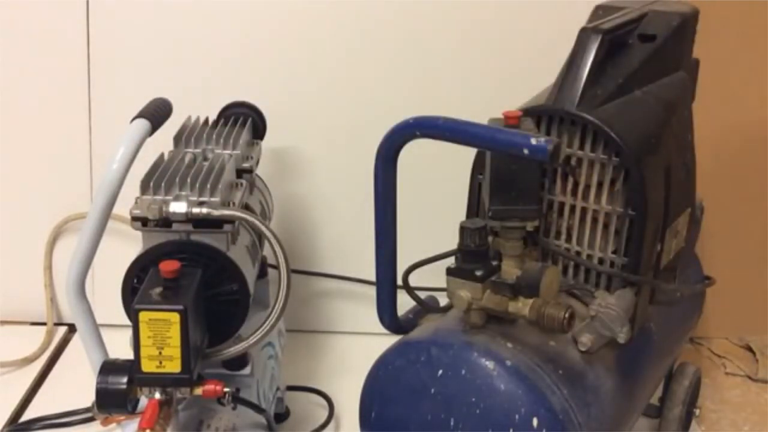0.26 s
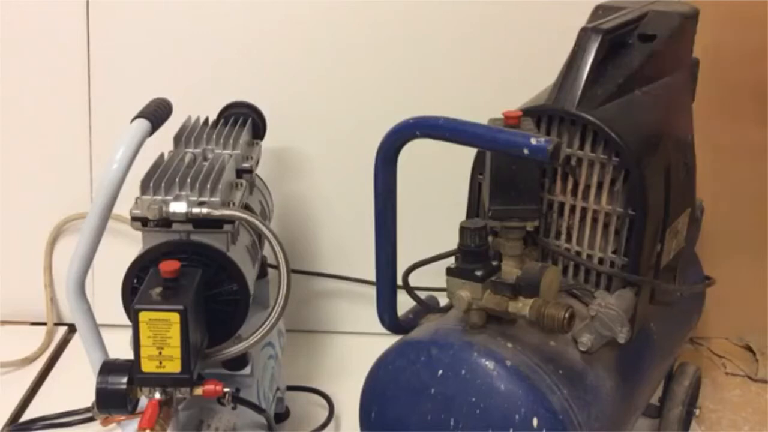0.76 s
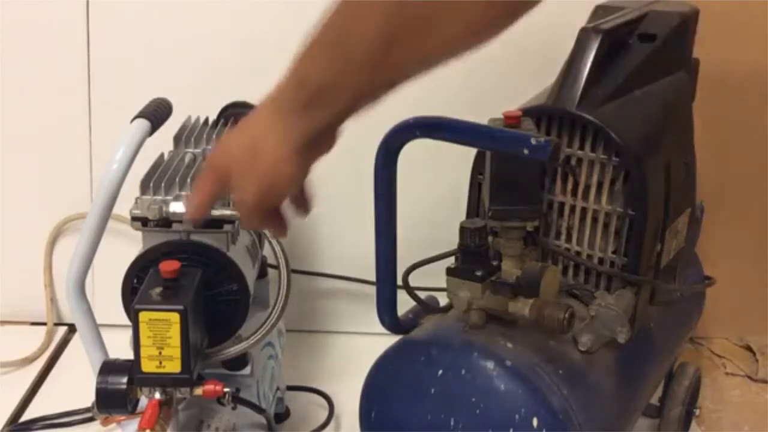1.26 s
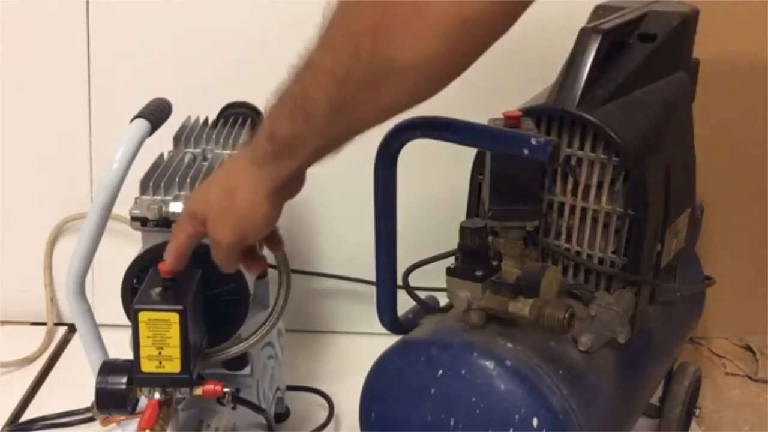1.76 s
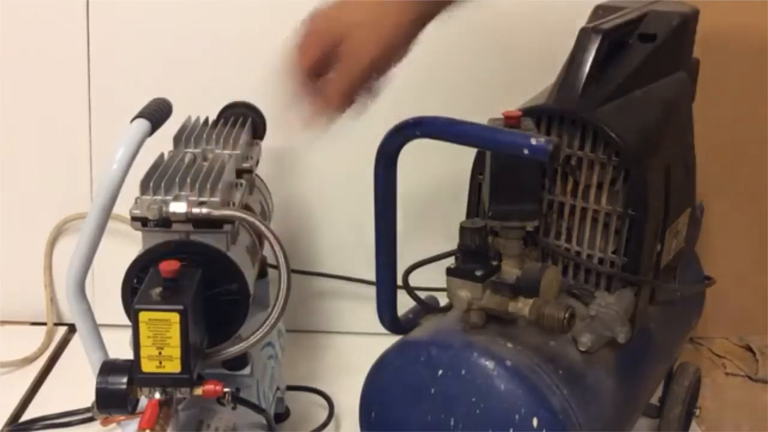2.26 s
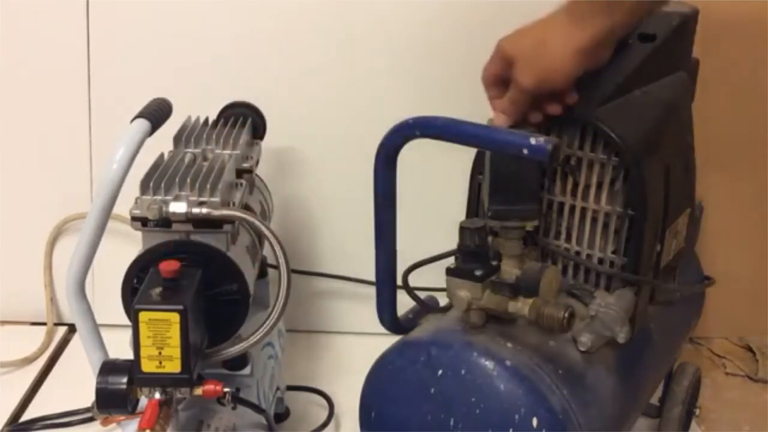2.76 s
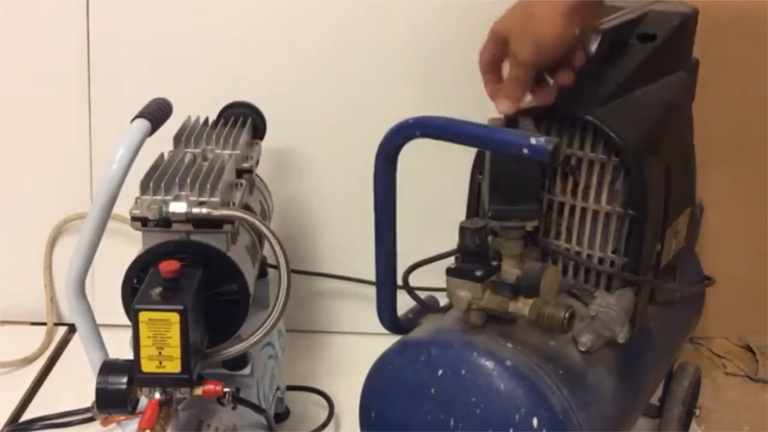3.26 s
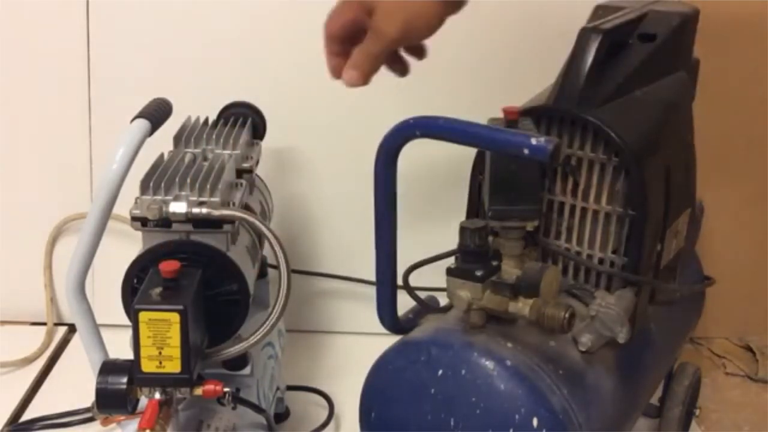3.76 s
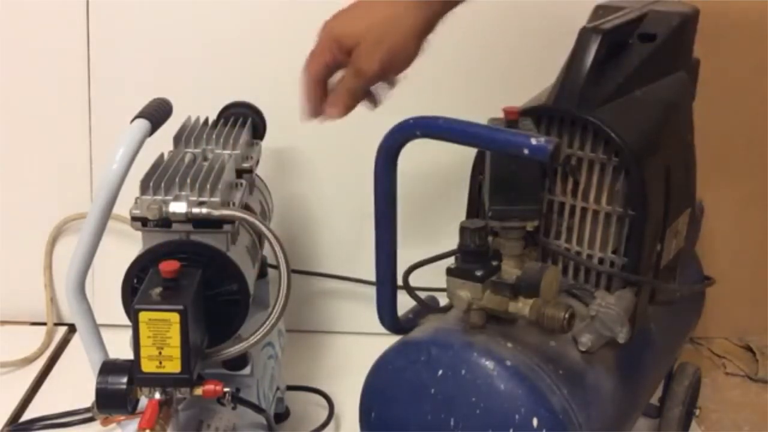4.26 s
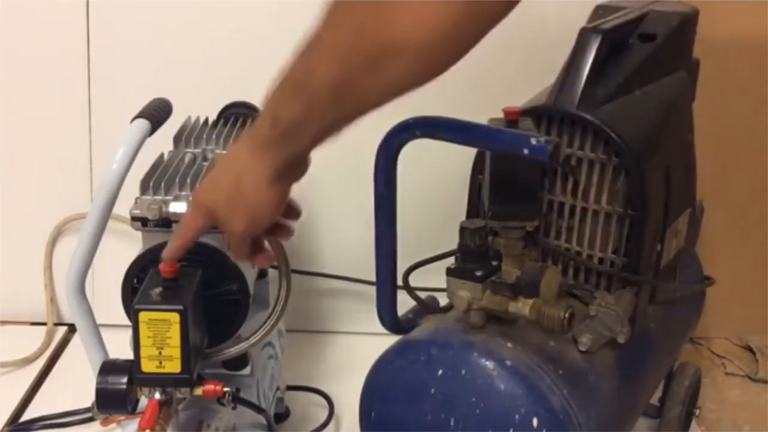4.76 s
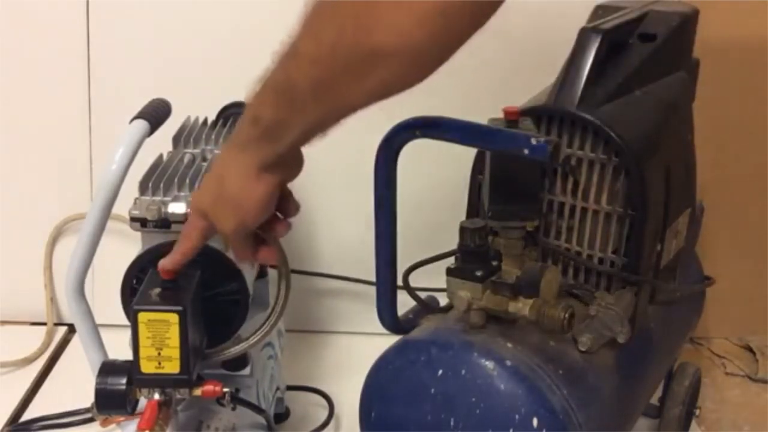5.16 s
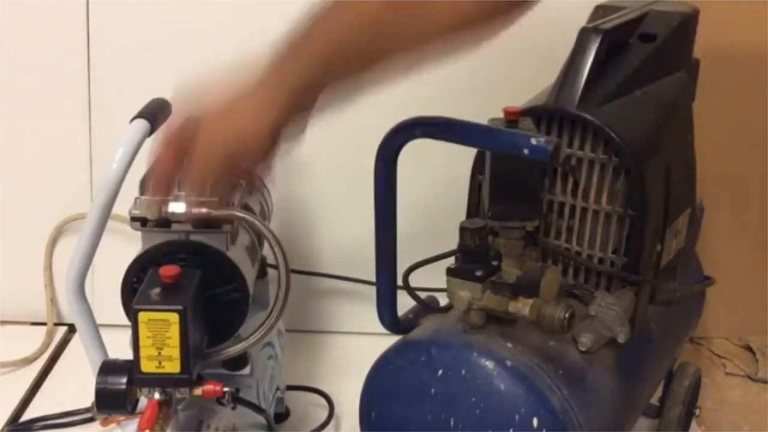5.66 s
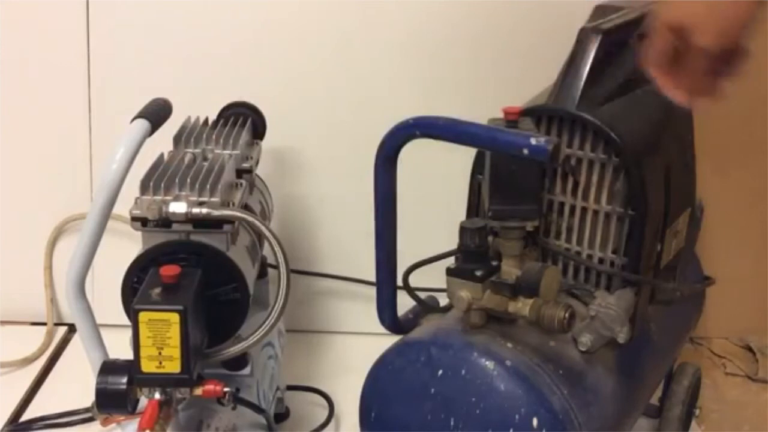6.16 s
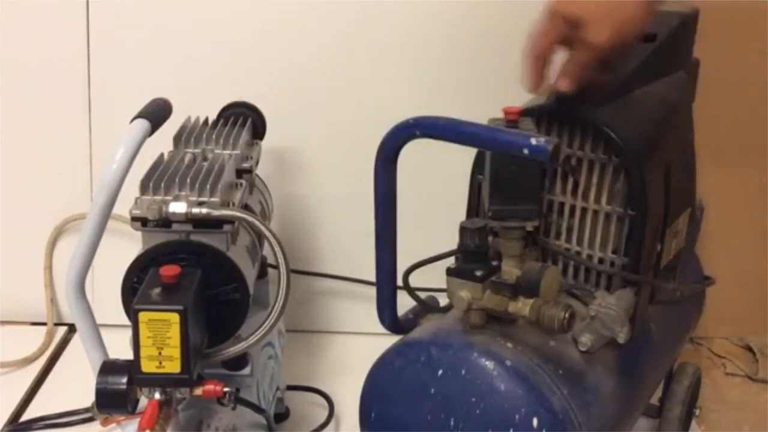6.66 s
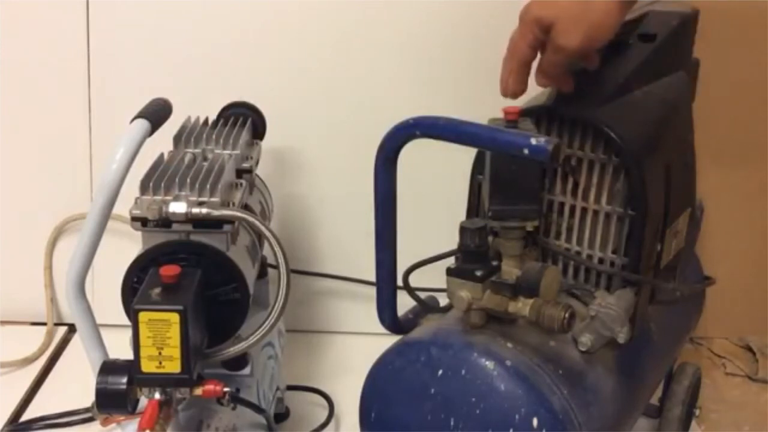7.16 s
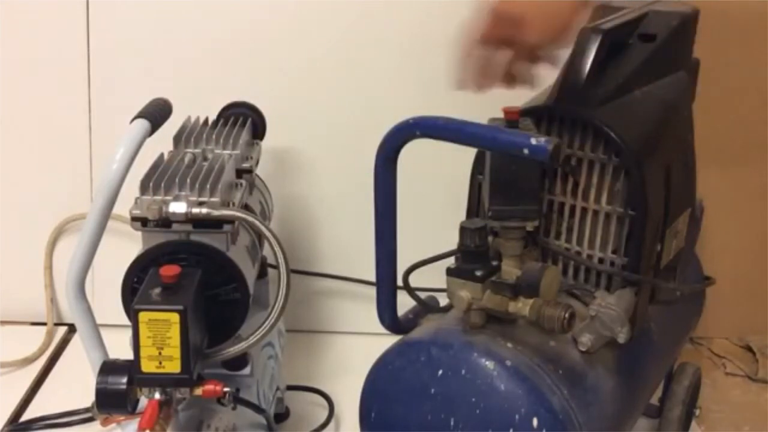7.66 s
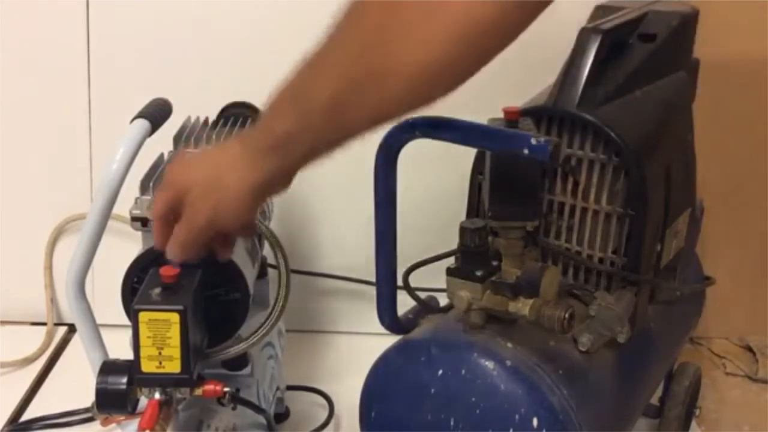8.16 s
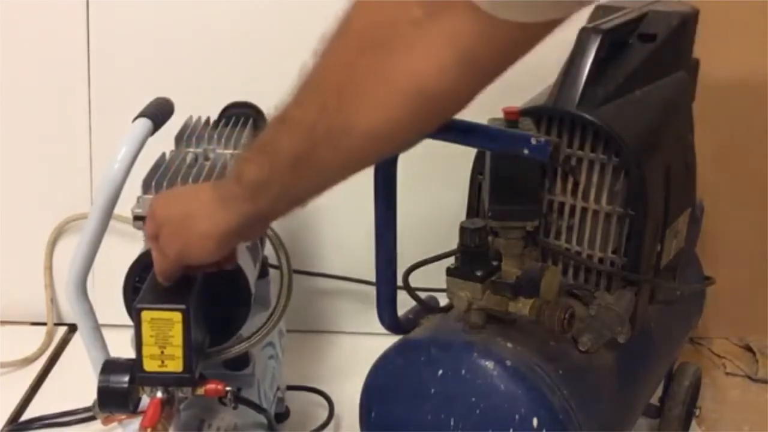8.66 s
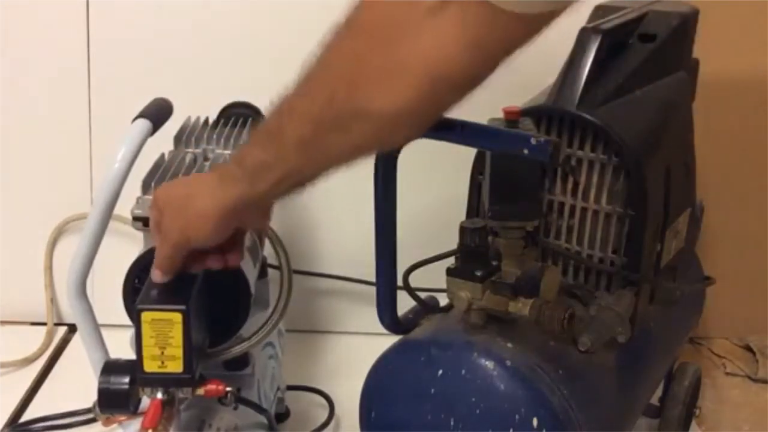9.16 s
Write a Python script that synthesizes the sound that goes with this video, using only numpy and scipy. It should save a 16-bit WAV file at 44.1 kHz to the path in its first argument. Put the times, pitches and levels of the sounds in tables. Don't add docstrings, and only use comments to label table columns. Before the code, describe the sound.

Soft, quick motor chugging is overtaken by a rattling start and a harsh compressor roar; a short pressure hiss, then a sharp final click.

```python
import sys
import numpy as np
from scipy import signal
from scipy.fft import irfft
from scipy.io import wavfile
from scipy.ndimage import uniform_filter1d

SR = 44100
rng = np.random.default_rng(int(sys.argv[2]) if len(sys.argv) > 2 else 0)


def magnitude_from_level(level_db):
    exponent = np.asarray(level_db, float) / 20
    return 10 ** exponent


def digitize_waveform(pressure):
    field = np.atleast_2d(pressure).T
    bounded = np.clip(field, -1, 1)
    quanta = np.round(bounded * 32767).astype(np.int16)
    wavfile.write(sys.argv[1], SR, quanta)


N = 415422

# (time [s], speed [turns/s])
QUIET_SPEED = [(0.0, 24.017), (1.4, 24.023), (2.8, 23.875), (4.0, 23.881), (5.35, 23.832)]
LOUD_SPEED = [(3.35, 48.478), (4.5, 48.419), (6.0, 48.38), (7.5, 48.375), (9.42, 48.355)]
LOUD_SPIN_UP = [(3.0, 18), (3.088, 19), (3.122, 36), (3.147, 45.5), (3.18, 49), (3.26, 48.5)]
# (frequency [Hz], level [dB per Hz])
QUIET_AIR = [(24, -51), (40, -20), (120, -4.5), (227, 2.5), (330, -12.5), (422, -6.5), (600, -14),
             (730, -9), (1320, -11), (1540, -7), (1700, -14.5), (2300, -14.5), (9360, -20.5), (15000, -28)]
LOUD_AIR = [(18, -66), (30, -30), (147, -15.5), (211, -12), (240, -24.5), (346, -8), (581, -15),
            (900, -14.5), (1520, -14), (1650, -18.5), (1920, -15.5), (7060, -15.5), (15000, -32)]
# (crank angle [turns], level over the steady rush [dB], rise [turns], fall [turns])
QUIET_VALVES = [(0, 5.5, .004, 0.033), (.05, -1, .05, 0.23), (.48, -1, .006, .03), (.58, 2, .03, .07)]
LOUD_VALVES = [(.08, 3.5, 0.18, 0.16), (.2, 4.5, 0.008, 0.014), (.52, -10, .02, 0.024),
               (.8, -4.5, 0.022, 0.028)]
# (frequency [Hz], width [Hz], level [dB])
COWL_PEAKS = [(4100, 300, 1.5), (5730, 300, 2.5), (6470, 490, -2), (7200, 260, -1), (9230, 820, 3.5),
              (13200, 600, 2), (14600, 900, 3)]
# (time [s], peak level [dB])
FIRST_BLOWS = [
    (3.0682, -6.5),
    (3.108, -3),
    (3.136, -11.5),
    (3.157, -15),
    (3.18, -10),
    (3.205, -13.5),
    (3.236, -14),
]
# (frequency [Hz], level [dB], time to die by 60 dB [s])
FRAME_MODES = [(265, 1.5, 0.13), (313, 4, 0.56), (476, -10, 0.11), (695, -15, 0.24), (805, 0.5, 0.031),
               (1038, -3.5, 0.16), (2045, -6.5, 0.18)]
# (frequency [Hz], level [dB per Hz])
COWL_RATTLE = [(300, -42), (700, 2), (1000, 9.5), (1400, -24), (2050, 1), (2600, -21), (3500, -1),
               (6000, -13), (12000, -41)]
# (frequency [Hz], level [dB per Hz])
VENT_AIR = [(1000, -30), (2500, -9), (4000, 1), (8000, 0), (12000, -7), (15000, -10)]
# (time [s], peak level [dB], frequency [Hz])
TOUCH_AND_CLICKS = [
    (2.648, -25, 620),
    (3.051, -20, 1900),
    (3.058, -30, 2900),
    (5.337, -16, 2490),
    (9.073, -4, 5400),
]
# (crank angle [turns], level [dB])
REED_SLAPS = [
    (.04, 4),
    (0.513, -1.5),
]
# (frequency [Hz], level [dB], time to die by 60 dB [s])
HEAD_MODES = [(1050, -4, 0.015), (1460, -9, 0.05), (1476, 2, 0.081), (1510, -4, 0.06), (1562, 0, 0.11),
              (1608, -21, 0.073), (1920, 2.5, .02), (2400, -3, 0.026), (4200, -19, 0.0054)]
# (multiple [of crank speed], level [dB], moment of swing [s], swing [dB])
QUIET_ORDERS = [(1, -43, 1, -2), (2, -26, 1, 0), (3, -24, .3, -3), (4, -1, 1, 0), (5, -1, .3, -2),
                (6, -7.5, .3, 2), (7, -11.5, 1, 3.5), (8, -14, 2.5, 0), (9, 2.5, 0.12, -6),
                (10, -4.5, .3, 1.5), (11, -24, 2.5, -6), (12, -5.5, .3, -19)]
LOUD_ORDERS = [(1, -30, 6, 0), (2, -55, 6, -10), (3, 4, 8.7, 2), (4, -1, 8.7, -2), (5, -20, 2.1, 5),
               (6, -10, 8.85, 6), (7, -0.5, 5.4, 2), (8, -1.5, 5.1, -1), (9, 0, 6.56, -6.5),
               (10, -13, 9, -13), (11, -9.5, 9.6, -25), (12, -18, 6.4, -27), (13, -13.5, 9.5, -9),
               (14, -18, 7.3, -2.5), (15, -8, 9.1, 7), (16, -8, 8.6, 5.5), (17, -9, 9.1, -35),
               (18, -15, 5, -31), (19, -9.5, 5.9, 3), (20, -19, 6.4, 11), (21, -13, 7.05, 9.5),
               (22, -7, 8.6, -17), (23, -18, 8, 5), (24, -18.5, 4.2, -10)]
# (frequency [Hz], width [Hz], level [dB], moment of swing [s], swing [dB])
QUIET_CASING = [(384, 17, -15.5, 1, -2), (408, 20, -15, 1, -11), (432, 8.9, -9.5, 1, 1),
                (480, 19, -22, .3, -17), (528, 7.8, -8.5, 2.9, -3.5), (576, 28, -28, .8, 8),
                (696, 18, -12, .3, -12), (744, 14, -13.5, 1, 1), (854, 140, -17.5, 1, -4),
                (990, 80, -17.5, 1, 0), (1056, 20, -19, 1, 6), (1152, 17, -13.5, 1, 3),
                (1253, 41, -12.5, .3, -12)]
LOUD_CASING = [(1222, 125, -11, 7, 2), (1355, 37, -10.5, 3.9, -12), (1452, 33, -21.5, 8, 8.5),
               (1500, 57, -10.5, 1.46, -17.5), (1549, 17, -7, 7, -7), (1645, 36, -20, 4, -6),
               (1742, 36, -15, 3.7, 2), (1890, 73, -11.5, 3.7, -9), (1984, 62, -12.5, 7, -1),
               (2081, 29, -15, 7, -7), (2140, 180, -15, 1.8, 21), (2390, 110, -15.5, 7, -11),
               (2900, 50, -13, 6.9, 2.5), (3310, 200, -17, 7, -3)]
# (frequency [Hz], crank angle [turns])
ANSWER_ANGLES = [(270, .3), (310, 1.07), (415, .62), (455, .18), (1100, .28), (2000, .4)]


def loud_pump():
    t = np.arange(N) / SR
    turns = crank(LOUD_SPIN_UP + LOUD_SPEED, stroke_s=6.513)
    first_s, second_s = FIRST_BLOWS[0][0], FIRST_BLOWS[1][0]

    pressure = np.clip((t - 3.1) / 0.051, 0, 1)
    surge_db = -1 * np.exp(-np.maximum(t - second_s, 0) / 0.053)
    strokes = pulse_train(turns, 0, pressure * magnitude_from_level(-15.5 + surge_db), uneven_db=0.5, jitter_s=.00003)
    bodies = stances(LOUD_ORDERS, LOUD_CASING, between_db=-32, turn_hz=48.39, count=90,
                     moments=np.linspace(3.4, 9.4, 11))
    knock = casing(strokes, *bodies, 48.39, spread=.65, walk=.1, rocking=2, arrival=ANSWER_ANGLES)

    hiss = valve_rush(turns, LOUD_VALVES, LOUD_AIR, patchy_db=.9, uneven_db=2.0, gated_hz=1200, peaks=COWL_PEAKS)
    running = np.clip((t - first_s) / 0.0044 + 1, 0, 1)
    since = np.maximum(t - first_s, 0)
    air_db = -18.5 - 12.5 * np.exp(-(since / 0.068) ** 2) + 0.28 * slow_drift(15)

    throb = motor(turns - .3, order=2, throb_s=6.36, rock_db=-26.5, hum_db=-28)
    throb = np.clip((t - 3.1) / 0.035, 0, 1) ** 2 * throb
    return knock + throb + running * magnitude_from_level(air_db) * hiss


def quiet_pump():
    t = np.arange(N) / SR
    turns = crank(QUIET_SPEED, stroke_s=1.385)
    off_s, run_down_db_per_s = 5.34, 250
    running = magnitude_from_level(-run_down_db_per_s * np.clip(t - off_s, 0, .5))
    level = running * magnitude_from_level(-35)

    strokes = pulse_train(turns, 0, level, uneven_db=.6, jitter_s=.00005)
    bodies = stances(QUIET_ORDERS, QUIET_CASING, between_db=-31.5, turn_hz=23.99, count=54,
                     moments=np.linspace(0, 3, 5))
    knock = casing(strokes, *bodies, 23.99, spread=.06, walk=.15, rocking=4)

    slaps = sum(pulse_train(turns, angle, level * magnitude_from_level(db), uneven_db=1.3, jitter_s=.00005)
                for angle, db in REED_SLAPS)
    head_ring = signal.oaconvolve(slaps, ringing(HEAD_MODES, size=4000))[:N]
    head = magnitude_from_level(6.5) * highpass(head_ring, 780)

    hiss = valve_rush(turns, QUIET_VALVES, QUIET_AIR, patchy_db=.9, uneven_db=1.1, gated_hz=700)
    throb = level * motor(turns, order=4, throb_s=1.495, rock_db=-0.5, hum_db=-7.0)
    return knock + head + throb + running * magnitude_from_level(-37) * hiss


def vent():
    start_s, rise_s, hold_s = 5.335, 0.016, 0.097
    t = np.arange(N) / SR - start_s
    blast = magnitude_from_level(-16.5 - 120 * np.maximum(t - hold_s, 0))
    leak = magnitude_from_level(-23 - 39 * np.maximum(t, 0))
    opening = np.clip(t / rise_s, 0, 1)
    return opening * np.hypot(blast, leak) * air(VENT_AIR, patchy_db=3.0)


def first_blows():
    size = 12000
    out, t = np.zeros(N + size), np.arange(size) / SR
    rattle = air(COWL_RATTLE, patchy_db=1.2)
    fading = magnitude_from_level(-10.5 - 60 * t / 0.17)
    frame = ringing(FRAME_MODES, size)
    for s, db in FIRST_BLOWS:
        at = round(s * SR)
        out[at:at + size] += magnitude_from_level(db) * (frame + fading * rattle[at:at + size])
    return highpass(out[:N], 157)


def touch_and_clicks():
    size = 2000
    out = np.zeros(N + size)
    for s, db, hz in TOUCH_AND_CLICKS:
        at = round(s * SR)
        snap = ringing([(hz, 0, .01), (hz * 2.1, -2, .008), (hz * .7, -3, .008)], size)
        out[at:at + size] += magnitude_from_level(db) * snap
    return highpass(out[:N], 157)


def crank(speed, stroke_s):
    turns = np.cumsum(curve(speed)) / SR
    return turns - turns[round(stroke_s * SR)]


def pulse_train(turns, angle, level, uneven_db, jitter_s):
    whole = np.arange(np.ceil(turns[0]), turns[-1] - angle) + angle
    chance = rng.standard_normal((len(whole), 2))
    at = np.interp(whole, turns, np.arange(N)) + jitter_s * SR * chance[:, 0]
    at = np.clip(at, 0, N - 2)
    first, pulses = at.astype(int), np.zeros(N)
    size = magnitude_from_level(uneven_db * chance[:, 1]) * level[first]
    pulses[first], pulses[first + 1] = size * (1 - at + first), size * (at - first)
    return pulses


def stances(orders, modes, between_db, turn_hz, count, moments):
    multiple, t, bodies = np.arange(1, count + 1), np.arange(N) / SR, []
    between_db = between_db + 4 * rng.standard_normal(count)
    for s in moments:
        def swung(db, at_s, swing_db):
            return db + swing_db * np.exp(-((s - at_s) / 0.97) ** 2)

        power = magnitude_from_level(between_db) ** 2
        for hz, width, *row in modes:
            off_centre = 2 * (multiple * turn_hz - hz) / width
            power = power + (magnitude_from_level(swung(*row)) / (1 + off_centre ** 2)) ** 2
        low_db = [swung(*row[1:]) for row in orders]
        bodies.append(np.c_[multiple, np.r_[low_db, 10 * np.log10(power[len(orders):])]])
    return bodies, [np.interp(t, moments, one) for one in np.eye(len(moments))]


def casing(pulses, bodies, shares, turn_hz, spread, walk, rocking, arrival=None):
    order = np.transpose(bodies[0])[0]
    hz = np.fft.rfftfreq(16384, 1 / SR)
    at = np.r_[0, order, order[-1] + 4] * turn_hz
    gains_db = []
    for body in bodies:
        level_db = np.transpose(body)[1] - 25 * (order == rocking)
        gains_db.append(np.interp(hz, at, np.r_[-60, level_db, -60]))
    mean_db = np.mean(gains_db, axis=0)
    mirrored = np.log(magnitude_from_level(np.r_[mean_db, mean_db[-2:0:-1]]))
    causal = -np.imag(signal.hilbert(mirrored))[:len(hz)]
    late = np.cumsum(rng.random(len(at))) * spread
    if arrival:
        steps = np.diff(late, prepend=0) - spread / 2
        answer = np.interp(at - turn_hz / 2, *np.transpose(arrival))
        late = np.cumsum(answer + steps * np.clip(at / 200 - 2.3, 0, 1))
        causal = 0
    turn = np.exp(1j * causal - 2j * np.pi * np.interp(hz, at, late))

    paths = [(share, magnitude_from_level(gain_db)) for share, gain_db in zip(shares, gains_db)]
    for _ in range(3):
        re, im = rng.standard_normal((len(at), 2)).T * np.minimum(at / 600, 1) ** 2
        wander = np.interp(hz, at, re) + 1j * np.interp(hz, at, im)
        paths.append((walk * slow_drift(1.614), magnitude_from_level(mean_db) * wander))
    out = 0
    for share, gain in paths:
        ring = np.roll(irfft(gain * turn), 2000)[:8000]
        out = out + signal.oaconvolve(pulses * share, ring)
    return out[2000:N + 2000] / np.sqrt(np.sum(irfft(magnitude_from_level(mean_db)) ** 2) * turn_hz / SR)


def valve_rush(turns, valves, colour, patchy_db, uneven_db, gated_hz, peaks=()):
    power = np.ones(N)
    index = (np.floor(turns) - np.floor(turns[0])).astype(int)
    for angle, puff_db, rise, fall in valves:
        past = (turns - angle + 0.324) % 1 - .3
        puff = np.exp(np.where(past < 0, past / rise, -past / fall))
        sizes = magnitude_from_level(puff_db + uneven_db * rng.standard_normal(index[-1] + 1))
        power += (sizes ** 2)[index] * puff
    noise = air(colour, patchy_db, peaks=peaks)
    low = signal.lfilter(*signal.butter(1, gated_hz, fs=SR), noise)
    return low + (noise - low) * evened(np.sqrt(power))


def motor(turns, order, throb_s, rock_db, hum_db):
    mains_hz = 99.986
    hum = mains_hz * (np.arange(N) / SR - throb_s) + order * turns[round(throb_s * SR)]
    rock = magnitude_from_level(rock_db) * np.cos(2 * np.pi * order * turns)
    return rock + magnitude_from_level(hum_db) * np.cos(2 * np.pi * hum)


def ringing(modes, size):
    t = np.arange(size) / SR
    ring = sum(magnitude_from_level(db - 60 * t / t60) * np.sin(2 * np.pi * hz * t) for hz, db, t60 in modes)
    return ring / abs(ring).max()


def air(colour, patchy_db, ripple_db=1.35, peaks=()):
    frames, hz = N // 512 + 5, np.fft.rfftfreq(2048, 1 / SR)
    a, b, patches = rng.standard_normal((frames, len(hz), 3)).T
    ripple = evened(uniform_filter1d(patches[:, 0], size=4)) * np.minimum(hz / 2500, 1) ** 2
    patches = uniform_filter1d(patches, size=20, axis=0)
    patches = evened(uniform_filter1d(patches, size=6, axis=1))
    f, level_db = np.transpose(colour)
    level_db = np.interp(np.log(hz + 1), np.log(f + 1), level_db) + ripple_db * ripple
    level_db += sum(db * np.exp(-(2 * (hz - at) / width) ** 2) for at, width, db in peaks)
    z = (a + 1j * b) * magnitude_from_level(level_db[:, None] + patchy_db * patches)
    return evened(signal.istft(z, nperseg=2048, noverlap=1536)[1][:N])


def slow_drift(rate):
    t = np.arange(N // 256 + 2) * 256 / SR
    drift = sum(np.sin(2 * np.pi * (f * t + rng.random())) / np.sqrt(f)
                for f in np.geomspace(rate / 20, rate, 24))
    return np.interp(np.arange(N), t * SR, evened(drift))


def curve(rows):
    table = np.array(rows, float)
    return np.interp(np.arange(N) / SR, table[:, 0], table[:, 1])


def evened(x):
    return x / np.sqrt(np.mean(x ** 2) + 1e-20)


def highpass(x, hz):
    return signal.sosfilt(signal.butter(4, hz, "high", fs=SR, output="sos"), x)


def scene():
    return (quiet_pump() + loud_pump() + first_blows() + touch_and_clicks() + vent())[None]


def roll_off(x):
    return signal.sosfilt(signal.butter(12, 15680, fs=SR, output="sos"), x)


def record(dry):
    t = np.arange(N) / SR
    jump_s, before_db, duck_db, duck_s = 2.8283, -13, -4.5, 0.23
    since_loud = np.maximum(t - FIRST_BLOWS[1][0], 0)
    duck = duck_db * (1 - np.exp(-since_loud / duck_s))
    gain_db = np.where(t < jump_s, before_db, duck)
    edge = signal.firwin(1023, 15030, window=("kaiser", 9), fs=SR)
    mix = signal.oaconvolve(dry * magnitude_from_level(gain_db), edge[None], "same")
    return roll_off(mix)


dry = scene()
out = record(dry)
digitize_waveform(out)
```